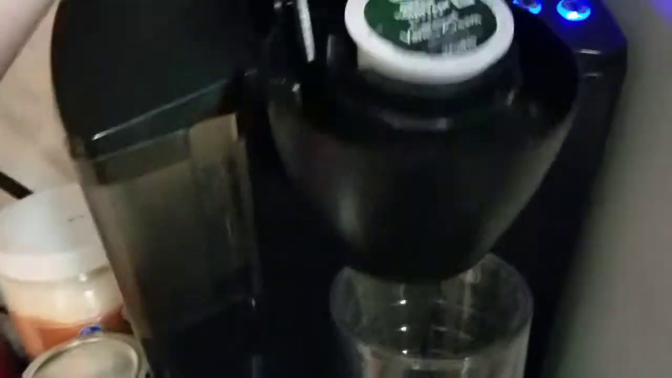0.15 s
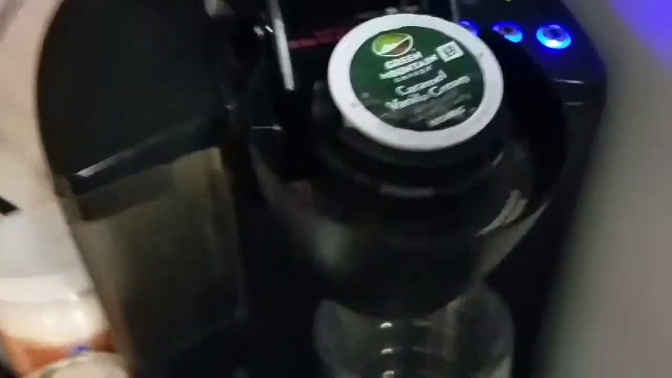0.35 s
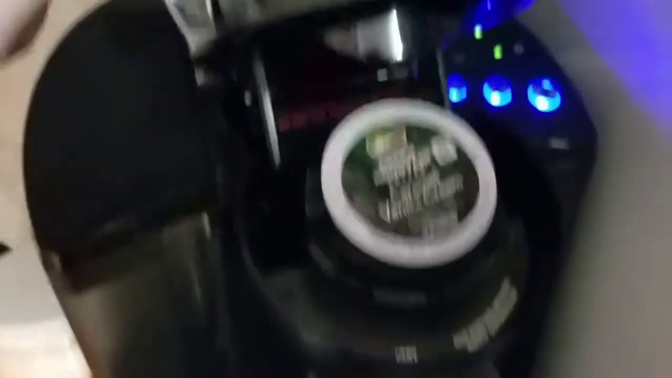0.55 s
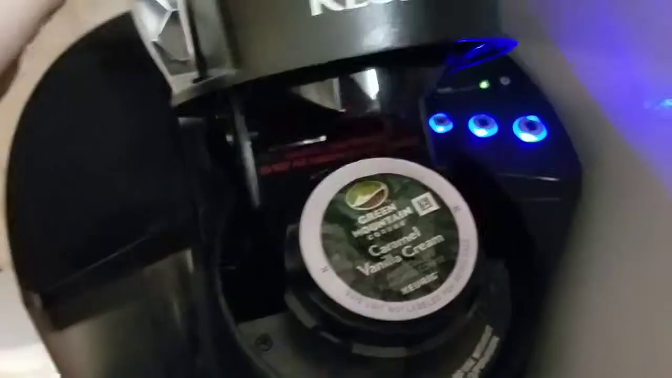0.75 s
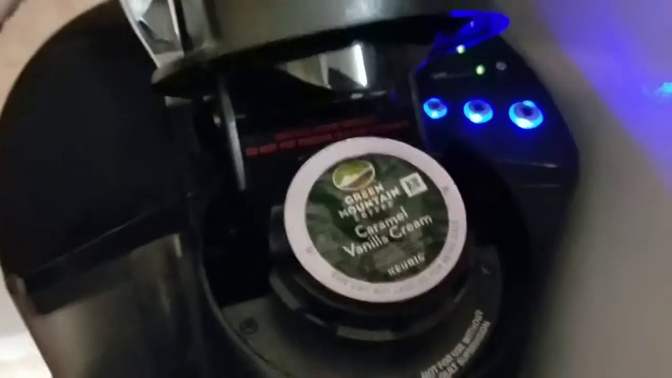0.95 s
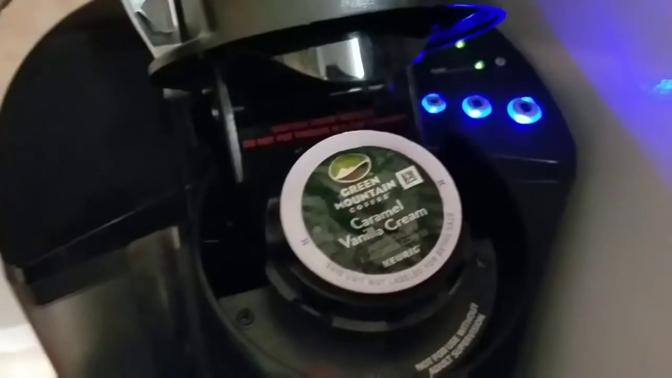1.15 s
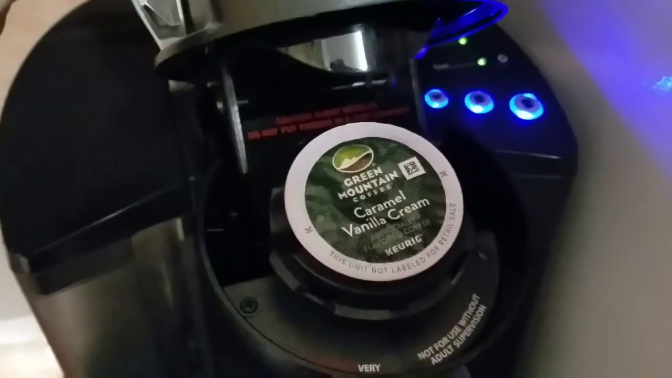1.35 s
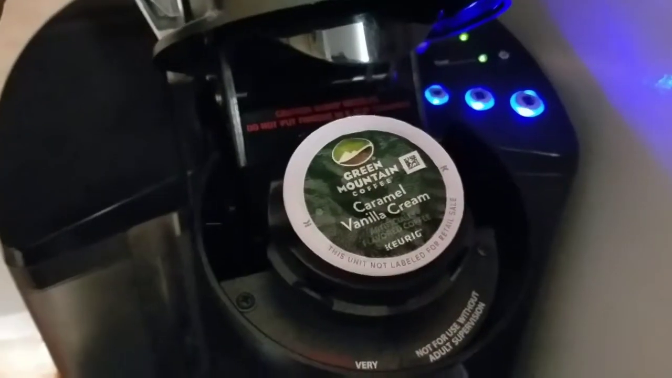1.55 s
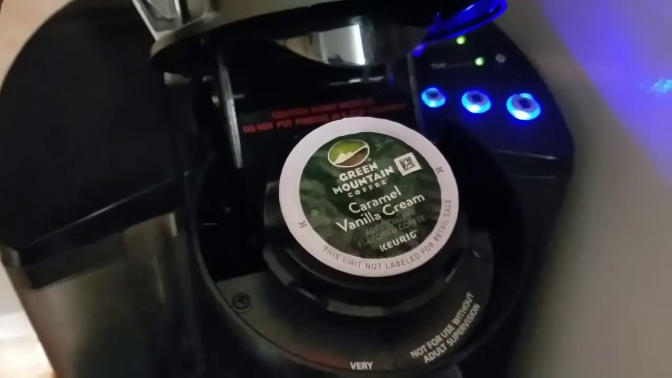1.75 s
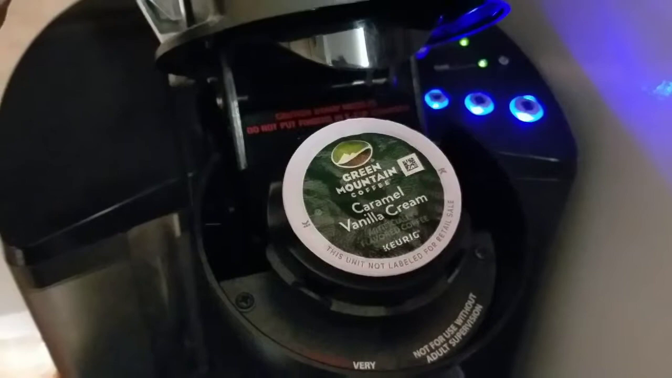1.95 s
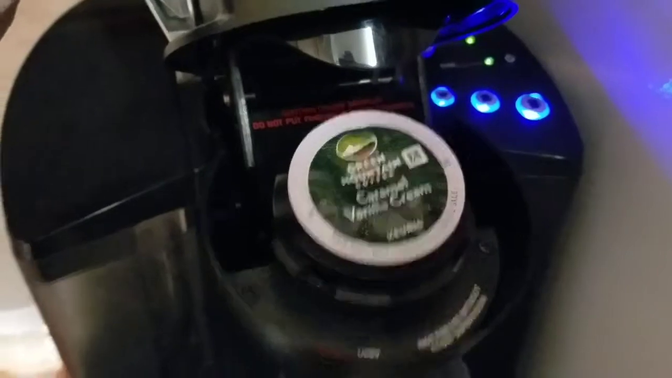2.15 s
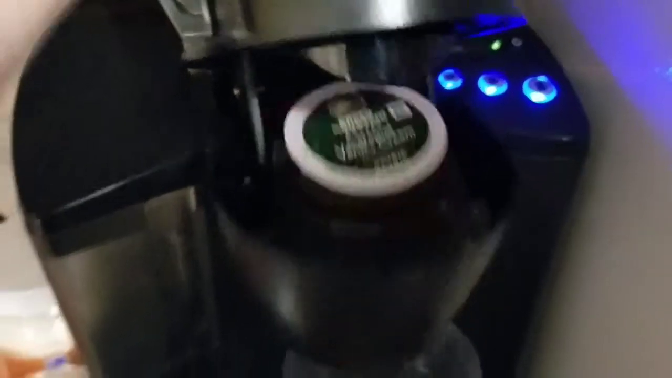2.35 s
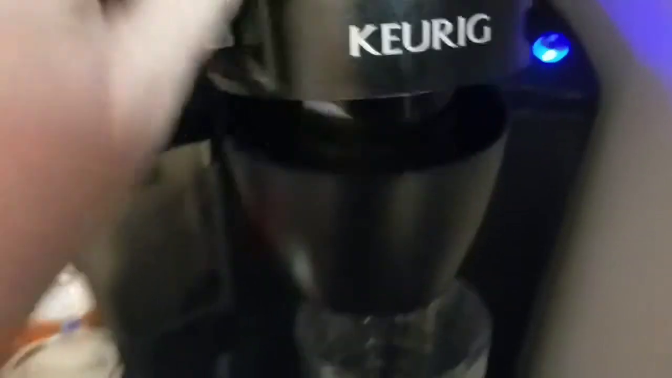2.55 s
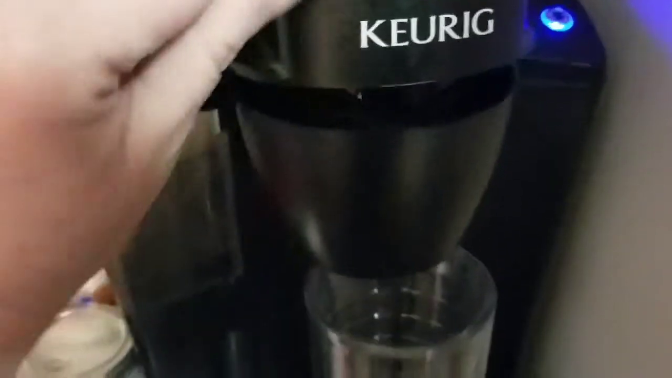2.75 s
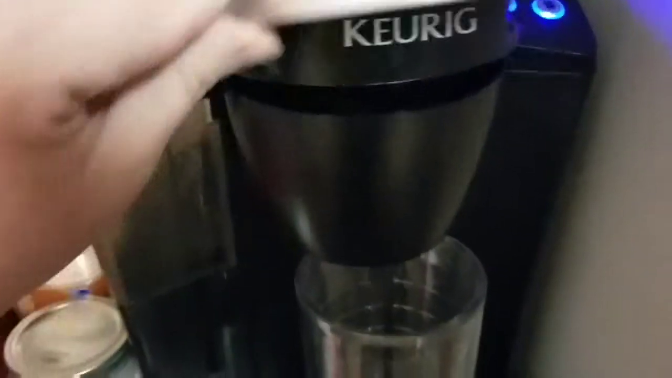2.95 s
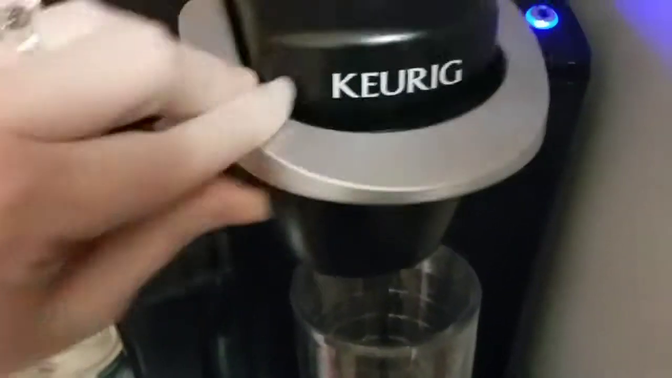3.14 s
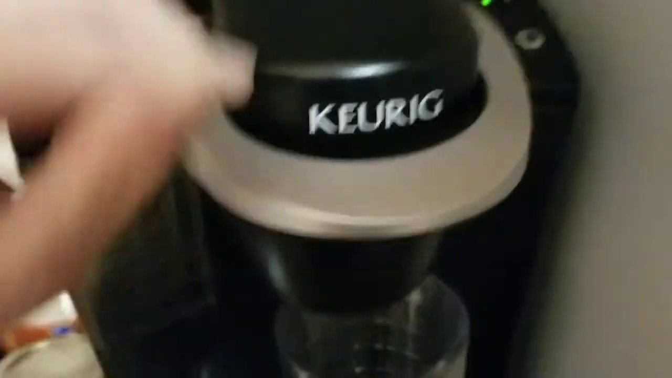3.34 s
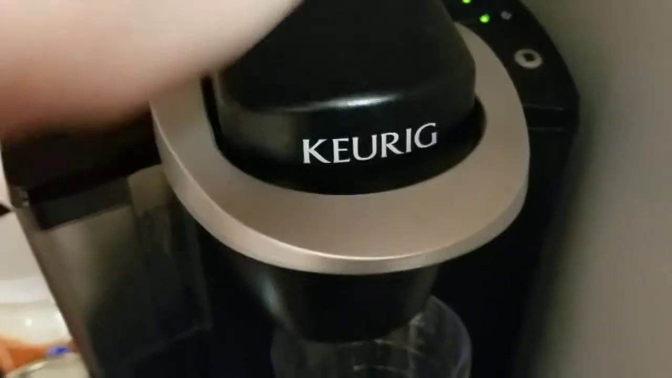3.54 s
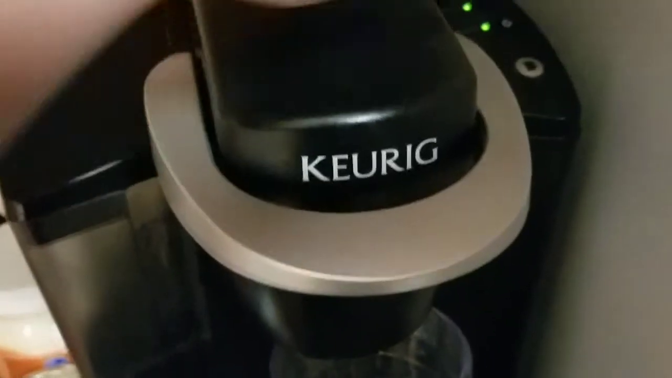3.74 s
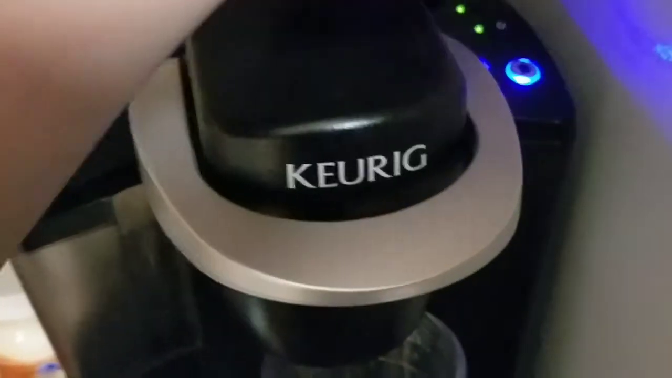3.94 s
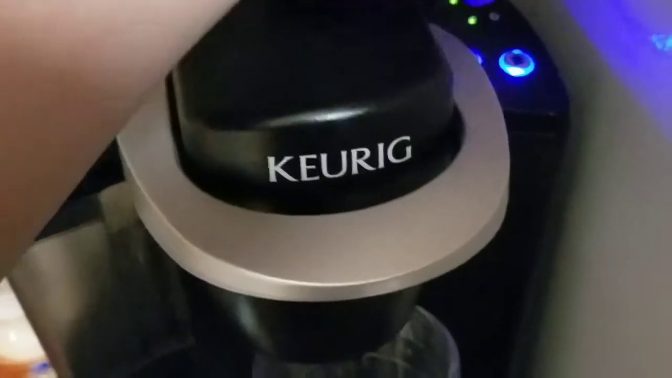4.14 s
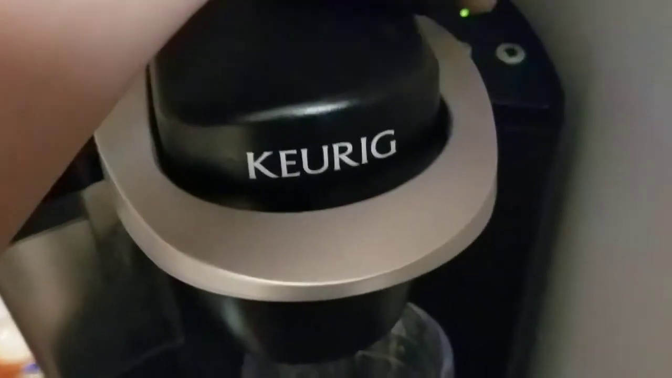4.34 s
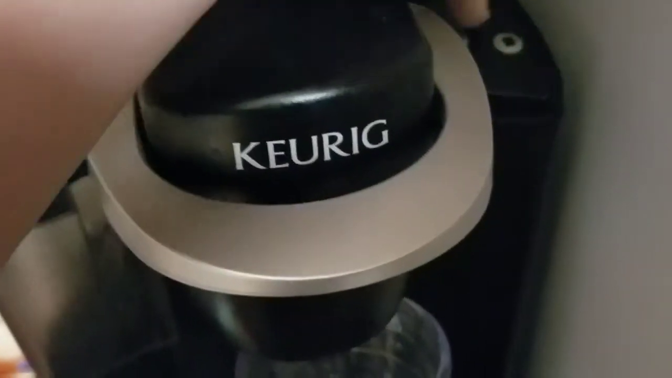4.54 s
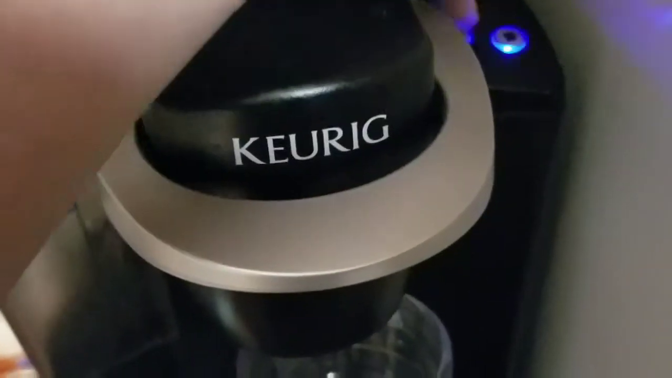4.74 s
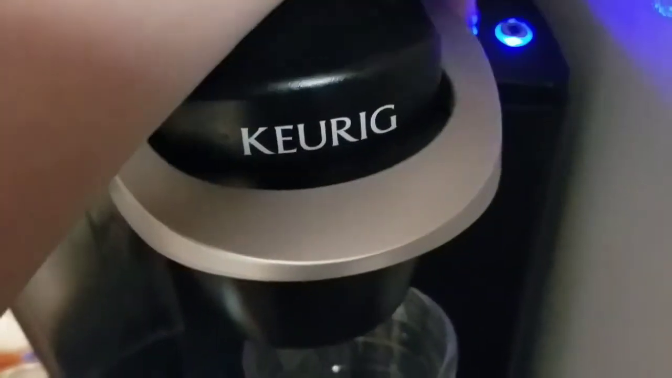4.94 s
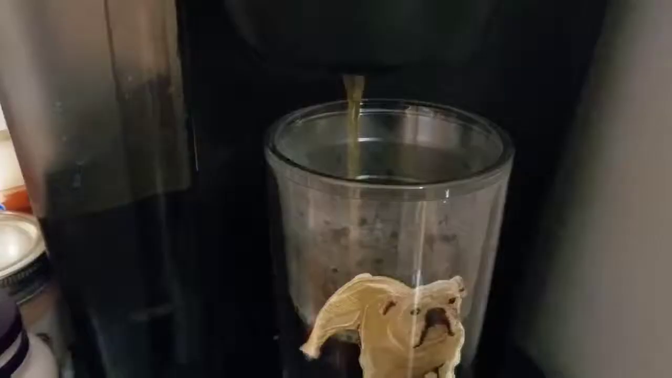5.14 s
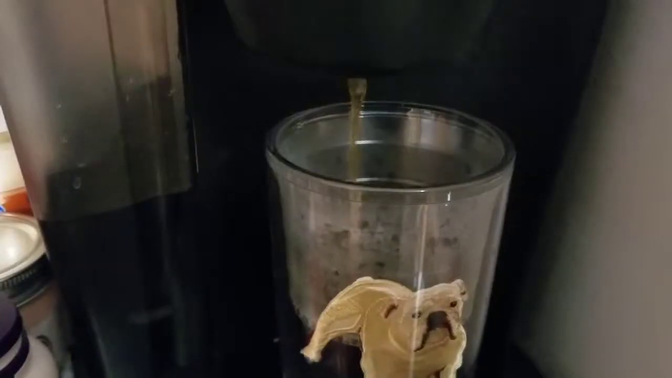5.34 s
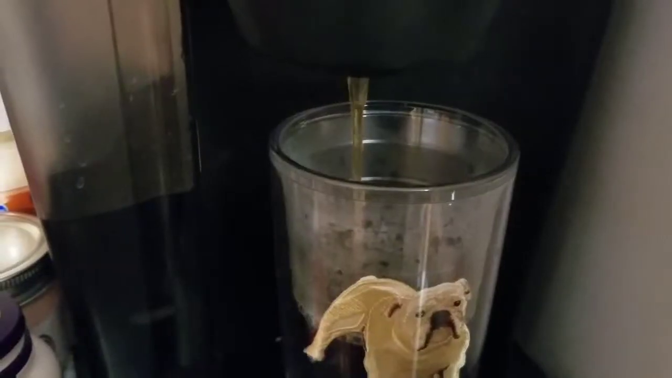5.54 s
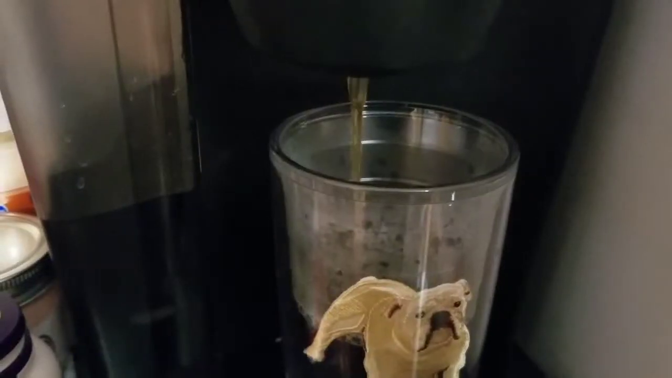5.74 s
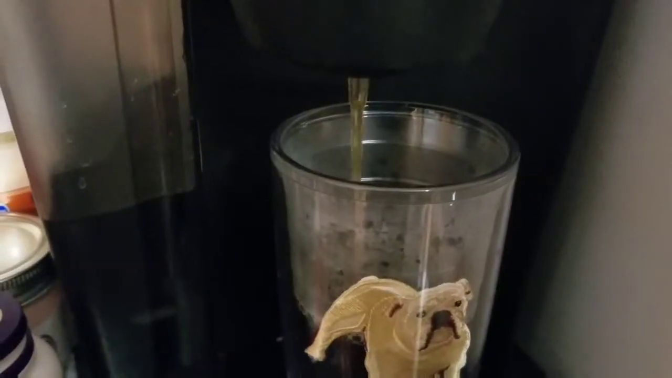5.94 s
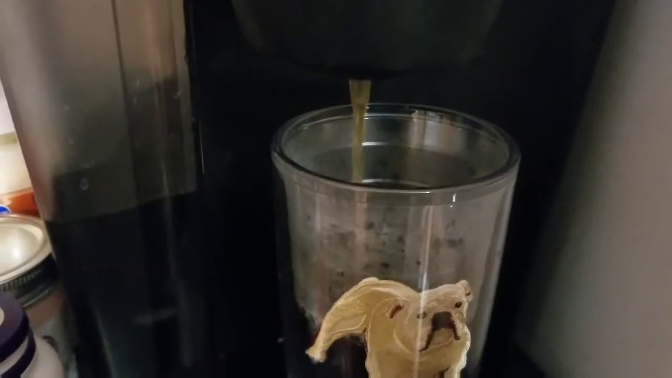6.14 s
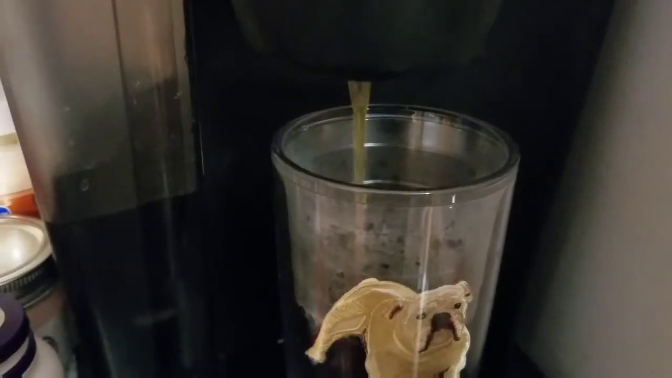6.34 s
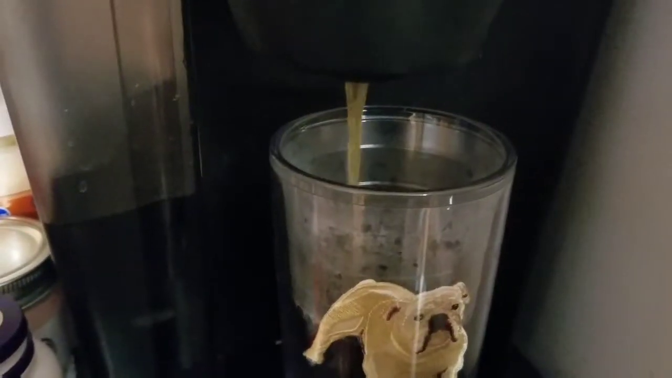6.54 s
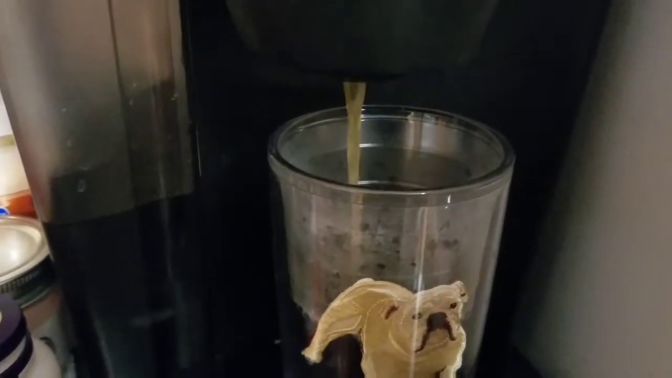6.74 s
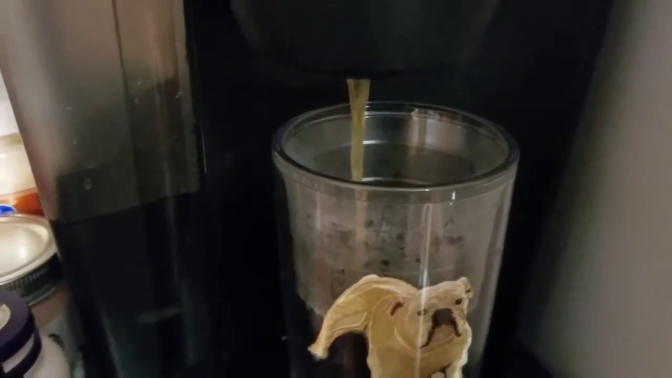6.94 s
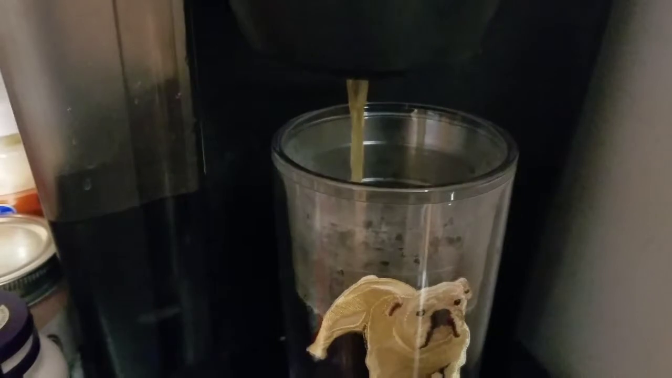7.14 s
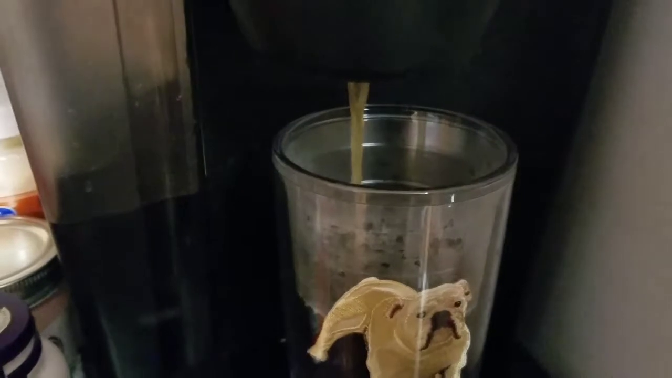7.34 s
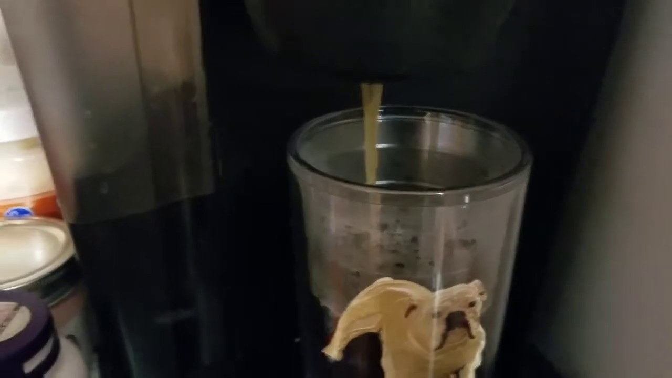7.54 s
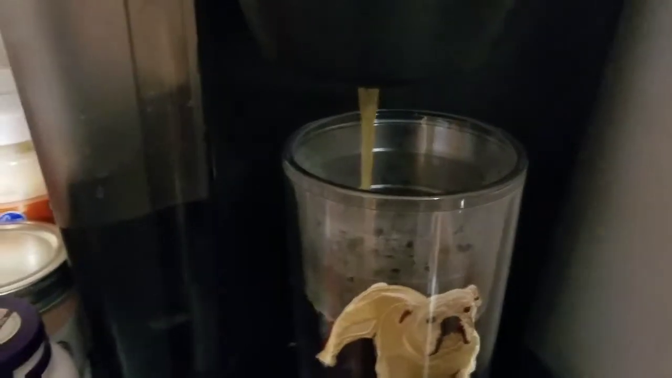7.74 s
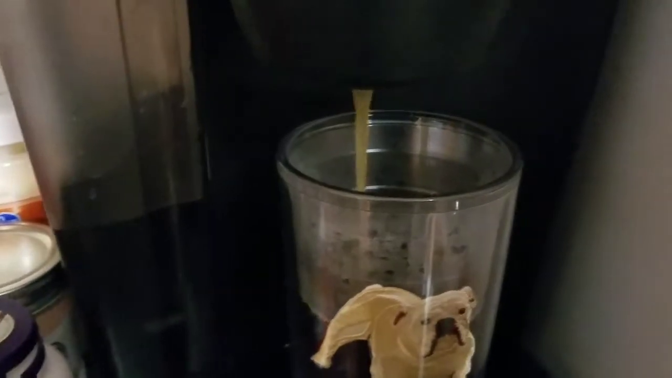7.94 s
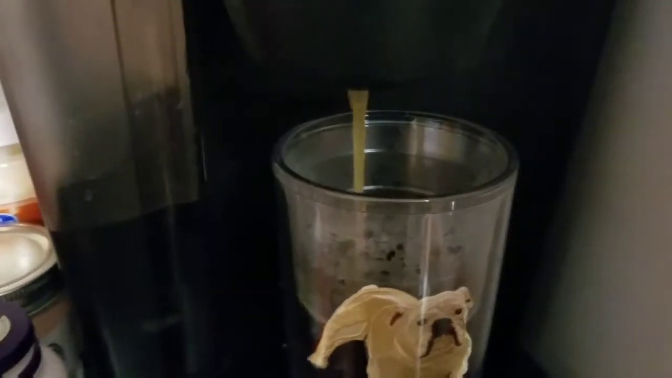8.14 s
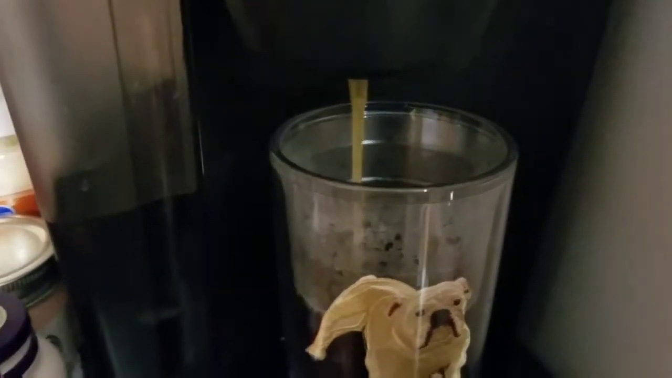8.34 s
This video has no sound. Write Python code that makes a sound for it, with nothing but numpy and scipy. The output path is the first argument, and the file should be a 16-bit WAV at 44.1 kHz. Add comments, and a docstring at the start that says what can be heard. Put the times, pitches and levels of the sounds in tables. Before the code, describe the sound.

A hand rubs and bumps the plastic of a pod coffee maker, then swings the head shut with a run of hollow clacks and a firm latch. A low kitchen hum sits underneath and fades away around a button click. Coffee then starts running into a tumbler with a few plops and a soft gurgle, while the nozzle sputters and hisses louder and louder. Everything is heard up close.

```python
"""A pod coffee maker on a kitchen counter, heard up close over the hum of appliances.
First a hand rubs and bumps the plastic, swings the brew head shut, latches it and presses a button;
each contact rings the head and its hollow housing. Everything fades to silence, then returns at 5 s:
coffee runs into a tumbler, drops plop as they trap bubbles, and spatter and steam
make the nozzle sputter and hiss ever louder."""
import sys
import numpy as np
from scipy import signal
from scipy.fft import rfft, irfft, next_fast_len
from scipy.io import wavfile
from scipy.ndimage import uniform_filter1d

SR = 44100
rng = np.random.default_rng(int(sys.argv[2]) if len(sys.argv) > 2 else 0)


def transcribe(signal):
    """Save signal, clipped to [-1, 1], as a 16-bit WAV file at the path in sys.argv[1]."""
    frames = np.atleast_2d(signal).T
    limited = np.clip(frames, -1, 1)
    pcm = np.round(limited * 32767).astype(np.int16)
    wavfile.write(sys.argv[1], SR, pcm)


N = 373527
T = np.arange(N) / SR
FADE_FROM_S, BREW_FROM_S, FADE_IN_S = 3.55, 5.06, 0.0095


def undb(db):
    return 10 ** (np.asarray(db) / 20)


def level(x, db):
    return x * undb(db) / np.sqrt(np.mean(x ** 2))


def peak(x, db):
    return x * undb(db) / np.abs(x).max()


def attack_level(x, db):
    """Set the rms of the first 12 ms."""
    return x * undb(db) / np.sqrt(np.mean(x[:SR // 80] ** 2))


def decay(t, t60):
    return np.exp(-np.log(1000) * t / t60)


def add(out, s, x):
    i = int(s * SR)
    out[..., i:i + x.shape[-1]] += x[..., :N - i]


def on_log(points, hz):
    """Read (Hz, value) points on a log-frequency axis."""
    f, v = np.transpose(points)
    return np.interp(np.log(hz + 1), np.log(f), v)


def highpass(x, hz):
    return signal.sosfilt(signal.butter(2, hz, "high", fs=SR, output="sos"), x)


def band(x, hz, width_hz):
    """Resonance with gain 1 at the centre."""
    return signal.lfilter(*signal.iirpeak(hz, hz / width_hz, SR), x)


def steep_band(x, hz, width_hz):
    return band(band(x, hz, width_hz), hz, width_hz)


def body(x, peaks):
    """Parallel resonances with dark valleys between them, at rms 1."""
    return level(sum(undb(db) * steep_band(x, hz, 1.51 * width) for hz, width, db in peaks), 0)


def walk(rate):
    """Random levels held 1 / rate s and slewed twice; spread near 1."""
    k = int(SR / rate)
    steps = np.repeat(rng.standard_normal(N // k + 1), k)
    return 1.315 * uniform_filter1d(uniform_filter1d(steps, k), k)[:N]


def restless_body(x, peaks, rate, spread_db):
    """A body whose resonances swell and fade, each at its own moments."""
    out = 0
    for hz, width, db in peaks:
        gain = undb(db + spread_db * walk(rate)[-x.shape[-1]:]) * np.sqrt(width)
        out = out + gain * body(np.roll(x, int(hz), axis=-1), [(hz, width, 0)])
    return level(out, 0)


def grit(per_s, spread_db):
    """Two channels of tiny random impacts of very unequal size."""
    hit = rng.random(N) < per_s / SR
    size = uniform_filter1d(hit * undb(spread_db * rng.exponential(size=N)), 40)
    return (size / size.mean() + 0.95) * rng.standard_normal((2, N))


# room tone spectrum (frequency [Hz], relative level [dB])
RUMBLE_SPECTRUM = [(20, -28), (40, -12), (70, -12.5), (110, -3.5), (160, -11), (230, -5.5), (330, -15.5),
                   (410, -20.5), (545, -25), (1100, -34), (1260, -29.5), (1500, -35.5), (2200, -36),
                   (5400, -53), (14400, -54)]
def kitchen_rumble():
    """A bed of slowly breathing third-octave noise bands, nearly mono in the bass."""
    out, swell = 0, walk(0.65)
    for hz in 28 * 2 ** np.arange(0, 9.2, 1 / 3):
        mid, side = steep_band(rng.standard_normal((2, N)), hz, hz / 3)
        spread = np.clip(hz / 1000, .2, 1) * np.array([[1], [-1]])
        gain = undb(on_log(RUMBLE_SPECTRUM, hz) + 0.88 * swell + 1.6 * walk(4.1))
        out = out + gain * (mid + spread * side)
    return level(out, -48)


# tones of the appliance drone (pitch [Hz])
HUM_PITCHES = [59.4, 82.8, 102, 120, 207.7, 242, 415, 592, 1248, 1308, 3268, 3682]
# their mix (level [dB])
HUM_LEVELS = [-55, -56, -57, -48, -46.5, -56.5, -60.5, -72.5, -71.5, -75, -85, -86]
def appliance_hum():
    """Motors and mains hold tones that waver slightly in level and pitch."""
    out = 0
    for hz, db in zip(HUM_PITCHES, HUM_LEVELS):
        gain = np.sqrt(2) * undb(db + 2 * walk(12))
        pitch = hz * (1 + .003 * min(200 / hz, 1) * walk(9))
        out = out + gain * np.sin(2 * np.pi * np.cumsum(pitch) / SR)
    return out


# scrape colour of the plastic in three registers (centre [Hz], width [Hz], level [dB])
SCRAPE_LOW = [(777, 110, 3.5), (1083, 160, -9.5), (1412, 180, -0.5)]
SCRAPE_MID = [(1943, 280, 6), (2500, 720, 1), (3240, 390, -5.5), (4370, 900, -4)]
SCRAPE_TOP = [(6160, 1500, 7.4), (8800, 4700, 5), (12680, 4000, 1)]
# strokes of skin and hinge (peak time [s], swell [s], release [s], level [dB], brightness [dB])
STROKES = [(0.06, 0.45, .7, -56, 2), (0.16, 0.16, 0.11, -61, -6.5), (2.266, 0.19, 0.19, -50.5, -2),
           (2.484, 0.17, 0.1, -47.5, -3), (2.59, 0.074, .08, -55.5, 7.5), (3.138, 0.25, .25, -52, -2.5),
           (4.336, 0.28, .4, -60.5, 4.5)]
def plastic_rub():
    """Stick-slip grit plays through the plastic; each stroke swells and lets go."""
    drag, out = grit(per_s=1200, spread_db=1.1), 0
    low, mid, top = (restless_body(drag, peaks, rate=30, spread_db=2.8)
                     for peaks in (SCRAPE_LOW, SCRAPE_MID, SCRAPE_TOP))
    for s, swell, release, db, bright_db in STROKES:
        stroke = undb(db - 17 * np.maximum((s - T) / swell, (T - s) / release))
        out = out + stroke * (undb(1.5 - bright_db) * low + mid + undb(bright_db - 11.5) * top)
    return out


def ring(modes, t, weight, decay_scale):
    """Damped modes; every blow lands elsewhere, so their shares, signs and tuning change."""
    hz, db, t60 = np.transpose(modes)[:, :, None]
    share, detune, sign = rng.standard_normal((3, len(modes), 1))
    gain = undb(db + 2 * share) * weight(hz) * np.sign(sign)
    tones = np.sin(2 * np.pi * hz * (1 + 0.012 * detune) * t)
    return (gain * decay(t, decay_scale * t60) * tones).sum(0)


# hits of head, latch and button; the last three columns are relative to the level
# (time [s], level [dB], pitch [Hz], snap [dB], thud [dB], crack [dB])
LATCH_HITS = [(2.208, -36.5, 729, -12, -1.5, -30), (2.393, -35.5, 740, -13, 10, -19),
              (2.433, -23, 1310, -9, 0, -15), (2.442, -17, 1550, -12.5, -6, -22.5),
              (2.49, -25.5, 734, -6.5, 0.5, -32.5), (2.553, -29, 1310, -22, -6.5, -30),
              (2.645, -28.5, 700, -11.5, -6.5, -25), (2.665, -18, 732, 1, -13.5, -18.5),
              (2.701, -30.5, 783, -9.5, -6, -20.5), (2.719, -30.5, 738, -13.5, -11, -22.5),
              (2.746, -31, 794, -11.5, 4.5, -24.5), (2.971, -18.5, 727, -15, 5, -31.5),
              (3.002, -8.5, 1000, -10.5, -9, -23), (3.016, -6.5, 650, -9.5, 0, -30.5),
              (3.526, -9.5, 1500, -14, -33, -28.5), (3.532, -16.5, 944, -17.5, -8, -31),
              (4.785, -40.5, 980, -16, 10, -32), (4.922, -29.5, 703, -18, -1, -30.5),
              (4.992, -18.5, 953, -19, -12, -31)]
# joints tick under the hand (time [s], level [dB], relative crack [dB])
JOINT_TICKS = [(0.13, -46, -10.5), (0.249, -53, -6.5), (0.715, -44.5, -35), (1.767, -50.5, -24),
               (2.086, -36.5, -28), (2.763, -39, -20.5), (3.17, -40, -17), (3.215, -37.5, -28),
               (3.236, -33, -24), (3.282, -35.5, -20), (3.317, -43.5, -23.5), (3.339, -48, -13.5),
               (3.4, -42, -16), (4.288, -47, -13)]
# dull bumps on the housing (time [s], thud level [dB])
HOUSING_BUMPS = [(0.865, -30), (1.119, -39), (1.693, -38), (2.045, -33), (3.092, -16.5)]
def blows():
    """Every blow on the machine, in the columns of LATCH_HITS."""
    ticks = [(s, db, 900, -12.5, -5, crack_db) for s, db, crack_db in JOINT_TICKS]
    bumps = [(s, db - 18, 800, -10, 18, -21) for s, db in HOUSING_BUMPS]
    return LATCH_HITS + ticks + bumps


# modes of the brew head and the hollow housing (pitch [Hz], level [dB], t60 before scaling [s])
HEAD_MODES = [(559, 8, 0.022), (729, 3, 0.057), (970, 6.5, 0.026), (1100, 0.5, 0.015), (1280, 4, 0.023),
              (1450, 3.5, 0.039), (1900, 2, 0.021), (2000, -1.5, 0.036), (2300, -4.5, 0.0086),
              (2362, 2.5, 0.034), (2700, -0.5, 0.02), (3100, -4.5, 0.03), (4000, 0.5, 0.0057),
              (4270, -5, 0.018), (4600, -9, 0.024)]
HOUSING_MODES = [(89, -7.5, 0.4), (155, -13.5, 0.23), (241.8, 1, 0.16), (294, -1.5, 0.17),
                 (363.5, -10, 0.34), (440.4, -16.5, 0.023), (536, -10, 0.055), (655, -10.5, 0.021)]
def plastic_knocks():
    """A rattling contact rings the head low and high, shakes the housing and cracks in the treble."""
    out, t = np.zeros((2, N)), T[:SR // 5]
    split_hz = 1600
    for s, db, hz, snap_db, thud_db, crack_db in blows():
        contact_noise, loose_noise = rng.standard_normal((2, len(t)))
        rattle_t60 = np.clip(0.049 * undb(.3 * thud_db), .004, .1)  # heavier blows rattle longer
        snap_hz = 2800 * undb(0.13 * snap_db)  # sharper blows snap higher
        left_db = 2 + 1.5 * rng.standard_normal()
        contact = contact_noise * decay(t, rattle_t60) * np.minimum(t / 0.00045, 1)
        contact[:3] += 4  # the first strike stands above the rattle
        shake = loose_noise * np.exp(-t / 0.023)  # loose parts keep the housing rattling
        low = ring(HEAD_MODES, t, lambda f: (f < split_hz) * np.exp(-(np.log(f / hz) / 0.51) ** 2),
                   decay_scale=0.66)
        high = ring(HEAD_MODES, t, lambda f: (f > split_hz) * np.exp(-(np.log(f / snap_hz) / .78) ** 2),
                    decay_scale=0.23)
        housing = ring(HOUSING_MODES, t, np.ones_like, decay_scale=0.6)
        knock = peak(signal.fftconvolve(low, contact)[:len(t)], db)
        snap = attack_level(signal.fftconvolve(high, contact)[:len(t)], db + snap_db)
        thud = peak(signal.fftconvolve(housing, shake)[:len(t)], db + thud_db)
        thud = highpass(thud, 56)  # cut the deep bass from the thud
        edge = highpass(contact + 0.17 * loose_noise * np.exp(-t / 0.029), 4100)
        crack = attack_level(band(edge, 5400, 10000), db + crack_db)
        add(out, s, (knock + snap + thud + crack) * undb(np.array([[left_db], [-left_db]]) / 2))
    return out


def bubble(t, hz, t60):
    """A bubble rings with a rising pitch as it nears the surface."""
    return np.sin(2 * np.pi * hz * (t + 2.8 * t ** 2)) * decay(t, t60)


def babble():
    """The stream stirs up a quiet crowd of bubbles; the high ones die soonest."""
    out, span_s, bubbles_per_s = np.zeros(N), N / SR - BREW_FROM_S, 220
    count = int(bubbles_per_s * span_s)
    for when, (pitch, size) in zip(rng.random(count), rng.standard_normal((count, 2))):
        hz = 965 * np.exp(.6 * pitch)
        add(out, BREW_FROM_S + when * span_s, undb(2.7 * size) * bubble(T[:SR // 30], hz, t60=14 / hz))
    return level(out, -52.5)


# drops that trap a bubble (time [s], level [dB], pitch [Hz], t60 [s])
DROP_PLOPS = [(5.237, -23.5, 817, 0.025), (5.321, -15, 867, 0.036), (5.386, -29, 940, 0.059),
              (5.441, -23.5, 902, 0.043), (5.832, -20.5, 910, 0.027), (5.869, -33.5, 1230, 0.024)]
# small splashes on the tumbler wall (time [s], level [dB], pitch [Hz])
WALL_TICKS = [(5.097, -39, 3030), (5.1463, -34.5, 3100), (5.1915, -32, 3200), (5.2118, -31, 4460),
              (5.51, -36, 3140), (5.6485, -41, 3330), (5.855, -44.5, 4600), (5.9588, -35, 3280),
              (6.4642, -32, 3200), (6.514, -32, 3250), (6.606, -32, 3100), (6.9304, -39.5, 4630),
              (7.657, -31, 3170), (8.007, -31, 3040)]
def drops():
    """Drops trap bubbles and stir the air column; splashes tick short and high."""
    out, t, wall_hz = np.zeros(N), T[:SR // 10], 3200
    for s, db, hz, t60 in DROP_PLOPS:
        impact = rng.standard_normal(len(t)) * np.exp(-t / 0.0019)
        air_column = peak(body(impact, CAVITIES[1:9]), -5.5)
        add(out, s, peak(bubble(t, hz, t60) + air_column, db))
    plop_ticks = [(s, db - 17.5, wall_hz) for s, db, *_ in DROP_PLOPS]
    for s, db, hz in WALL_TICKS + plop_ticks:
        splash = rng.standard_normal(len(t)) * np.exp(-t / .003)
        tick = peak(steep_band(splash, hz, 660), db)
        spray_db = db - 26 + 31 * np.log2(hz / wall_hz)  # higher ticks carry more spray
        add(out, s, tick + attack_level(highpass(splash, 4500), spray_db))
    return out


# resonances of the liquid column (centre [Hz], width [Hz], level [dB])
LIQUID_COLUMN = [(249, 108, 13.5), (426, 310, 0.5)]
# gulp accents (time [s], boost [dB])
GULP_ACCENTS = [(5.32, 4), (6.07, 13.5), (6.24, 10.5), (6.46, 11.5), (6.66, 9.5), (7.21, 7)]
def glug(spatter):
    """Spatter stirs the liquid column into a low, wavering gurgle with short gulps."""
    gulp_db = sum(boost_db * np.exp(-((T - s) / 0.04) ** 2) for s, boost_db in GULP_ACCENTS)
    db = -50.5 + 3 * walk(12) + gulp_db
    return undb(db[-len(spatter):]) * body(spatter, LIQUID_COLUMN)


# cavities of funnel and tumbler (centre [Hz], width [Hz], level [dB])
CAVITIES = [(514.5, 53, -12), (620.4, 62, -8.5), (679, 60, -1.5), (868, 78, -5), (990, 58, -7),
            (1053, 84, -3.5), (1151, 50, -7.5), (1410, 80, -6), (1487, 53, -13), (1907, 88, -17.5),
            (2035, 134, -13), (2274, 144, -13), (2397, 100, -13.5), (2565, 126, -13), (2812, 156, -20.5),
            (3100, 165, -26)]
def sputter(spatter, flutter_db):
    """Spatter excites fixed cavities, each of which swells at its own moments."""
    mono, out = spatter.sum(0), 0
    for hz, width, db in CAVITIES:
        spread = np.clip(0.43 * (hz - 300) / 600, .2, 0.43)  # long waves reach both sides more alike
        right_lag = int(SR * (.00015 + .0001 * rng.standard_normal()))
        push = (1 - spread) * np.array([mono, np.roll(mono, right_lag)]) + spread * spatter
        gain = undb(db + 0.5 * flutter_db + 1.68 * walk(25)[-len(mono):]) * np.sqrt(width)
        out = out + gain * body(push, [(hz, width, 0)])
    return level(out, 0)


# notches between the cavities (centre [Hz], width [Hz], depth [0-1])
NOTCHES = [(453, 79, 0.53), (782, 88, 0.95), (1264, 100, 0.43), (1680, 230, 0.5), (3480, 520, 0.58),
           (7520, 820, 0.4)]
def side_chambers(x):
    """Side chambers swallow narrow bands."""
    for hz, width, depth in NOTCHES:
        x = x - depth * band(x, hz, width)
    return x


# fader ride of coffee and steam (time [s], sputter level [dB], hiss level [dB])
FLOW_RIDE = [(5.06, -70.5, -82), (5.089, -44.5, -58), (5.26, -49, -57.5), (5.78, -54.5, -61),
             (5.91, -45, -59.5), (6.3, -46, -54.5), (6.75, -42.5, -51), (6.84, -48.5, -56),
             (7.05, -33, -51), (7.22, -29, -46.5), (7.65, -26.5, -45.5), (7.8, -33, -48), (8.07, -23, -41),
             (8.25, -25, -40), (8.47, -21, -34.5)]
# the nozzle spits, or falters on a negative boost (time [s], length [s], boost [dB])
SPITS = [(5.278, .035, -20), (5.639, 0.038, 11.5), (6.009, 0.035, 8.5), (6.06, 0.032, 13.5),
         (6.092, 0.036, 0), (6.149, 0.041, 14), (6.195, 0.033, 9), (6.238, 0.042, -6), (6.284, 0.087, 8.5),
         (6.813, 0.074, 6.5), (6.93, 0.016, 10.5), (7.129, 0.018, -6.5), (7.724, 0.045, 4.5),
         (8.116, 0.038, -10), (8.204, 0.014, -5), (8.291, 0.047, 4.5), (8.363, 0.02, 5.5),
         (8.445, 0.011, 4.5)]
# steam colour (centre [Hz], width [Hz], level [dB])
STEAM_BANDS = [(4444, 790, 5.5), (4790, 700, -6.5), (5840, 2200, -7), (8600, 1370, -4), (11500, 1500, -14),
               (13300, 7000, -13.5)]
def nozzle():
    """Coffee and steam leave the nozzle in gushes: sputter and hiss build over a low glug."""
    out, start, ramp_s = np.zeros((2, N)), int(BREW_FROM_S * SR), 0.0054
    t = T[start:]
    times, *rides = np.transpose(FLOW_RIDE)
    sputter_db, hiss_db = (np.interp(t, times, ride, left=-120) for ride in rides)
    gush_db = sum(boost_db * np.interp(t, [s, s + ramp_s, s + length, s + length + ramp_s], [0, 1, 1, 0])
                  for s, length, boost_db in SPITS)
    spatter = grit(per_s=1100, spread_db=1.5)[:, start:]
    flutter_db = walk(45)[start:]
    coffee = undb(sputter_db + gush_db) * sputter(spatter, flutter_db)
    jet = rng.standard_normal(spatter.shape) + 0.72 * spatter
    steam = restless_body(jet, STEAM_BANDS, rate=35, spread_db=1.8)
    hiss = undb(hiss_db + 0.44 * gush_db + flutter_db) * steam
    out[:, start:] = side_chambers(coffee + hiss) + glug(spatter.sum(0))
    return out


def room(x):
    """Each side hears the source, its own echoes off counter and wall, and the kitchen's tail."""
    t, near_db, tail_db = T[:SR // 2], 0.5, -10
    near = level(rng.standard_normal((2, len(t))) * decay(t, t60=0.029), near_db)
    tail = level(band(rng.standard_normal((2, len(t))), 1400, 6400) * decay(t, t60=0.27), tail_db)
    echoes = highpass(near + tail, 500) / np.sqrt(len(t))
    return (x + signal.fftconvolve(x, echoes, axes=1)[:, :N]) / np.sqrt(1 + undb(near_db) ** 2)


def scene():
    """The handling fades straight to silence; the brewing comes in on a quick fade."""
    fade = np.interp(T, [FADE_FROM_S, BREW_FROM_S, BREW_FROM_S + FADE_IN_S], [1, 0, 1])
    bed = kitchen_rumble() + appliance_hum()
    return fade * (bed + room(plastic_knocks() + drops() + babble()) + plastic_rub() + nozzle())


# stereo balance (frequency [Hz], left minus right [dB])
BALANCE = [(60, -9), (110, 3.5), (200, -5.5), (380, -4.0), (700, -8), (1290, 0), (2380, -2.5), (4400, -3.5),
           (8120, -3.5), (15000, 0.5)]
def record(dry):
    """The right microphone faces the machine and hears more; peaks are rounded and the top is cut."""
    n = next_fast_len(N)
    left_db = on_log(BALANCE, np.arange(n // 2 + 1) * SR / n)
    stereo = irfft(rfft(dry, n) * undb(np.array([left_db, -left_db]) / 2), n)[:, :N]
    top_cut = signal.ellip(8, .2, 40, 15900, fs=SR, output="sos")
    return signal.sosfilt(top_cut, np.tanh(stereo / 2) * 2)


dry = scene()
out = record(dry)
transcribe(out)
```